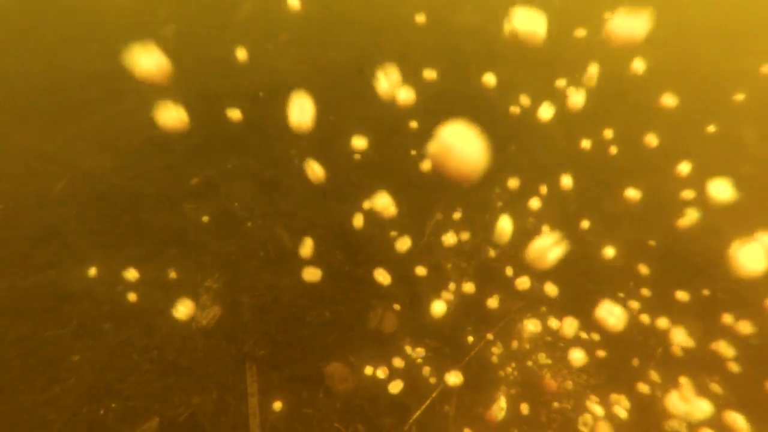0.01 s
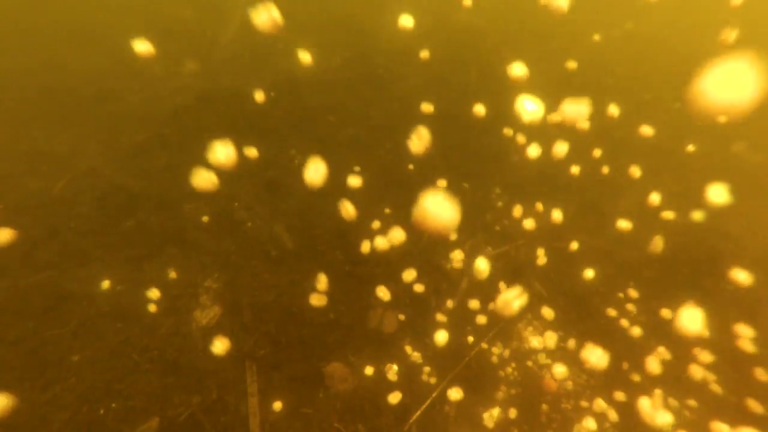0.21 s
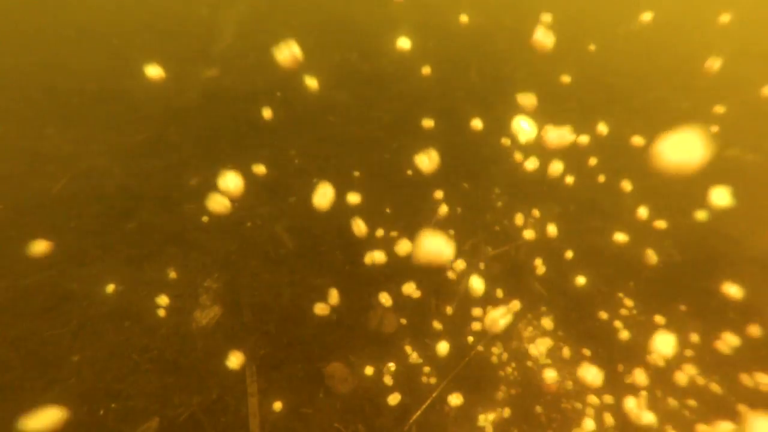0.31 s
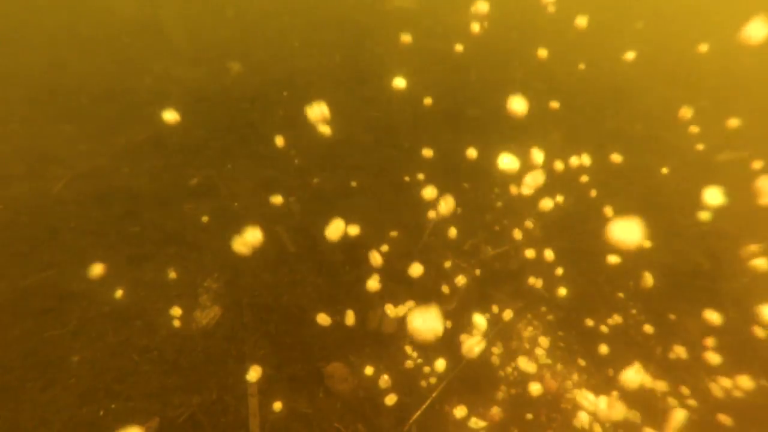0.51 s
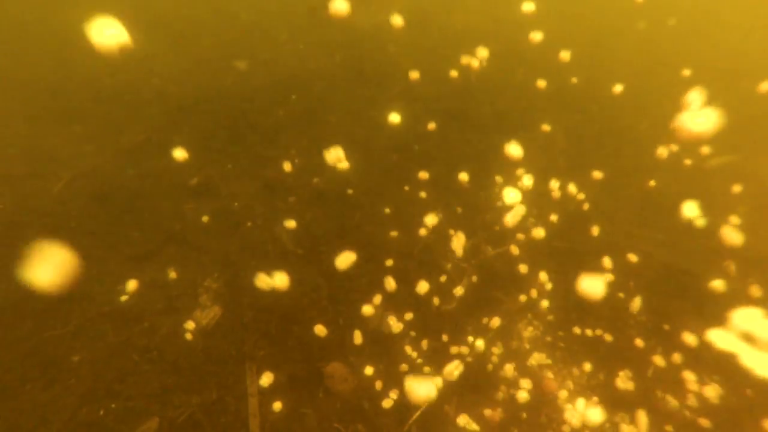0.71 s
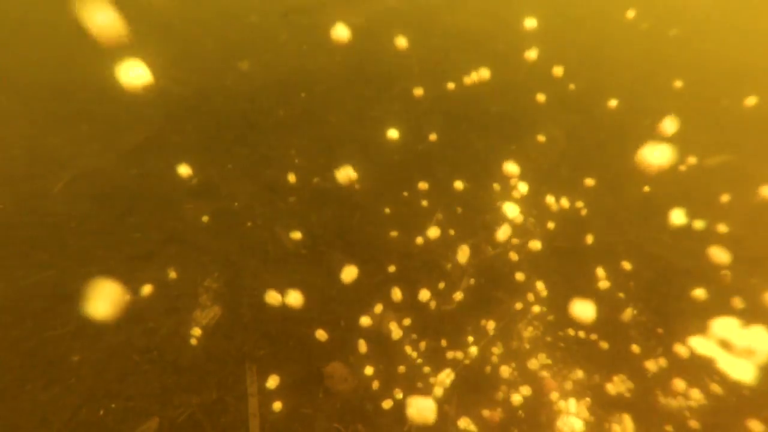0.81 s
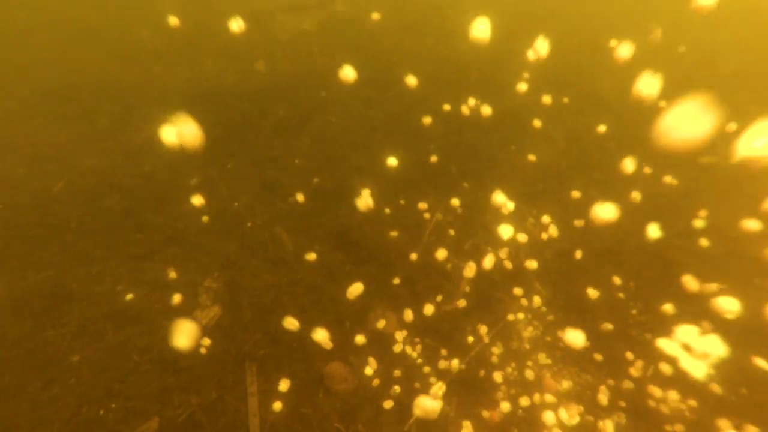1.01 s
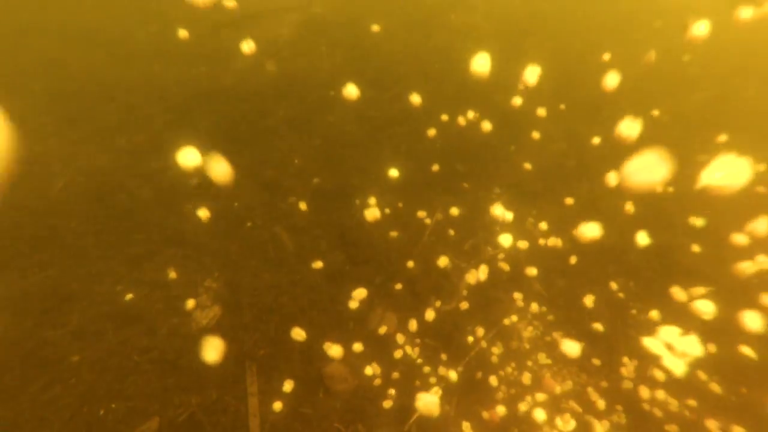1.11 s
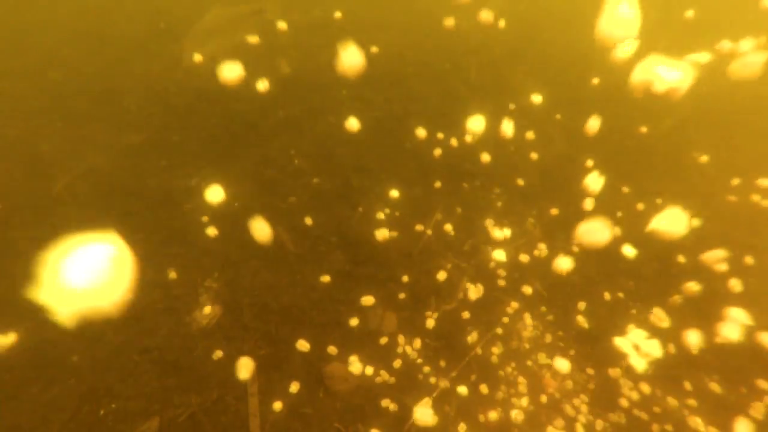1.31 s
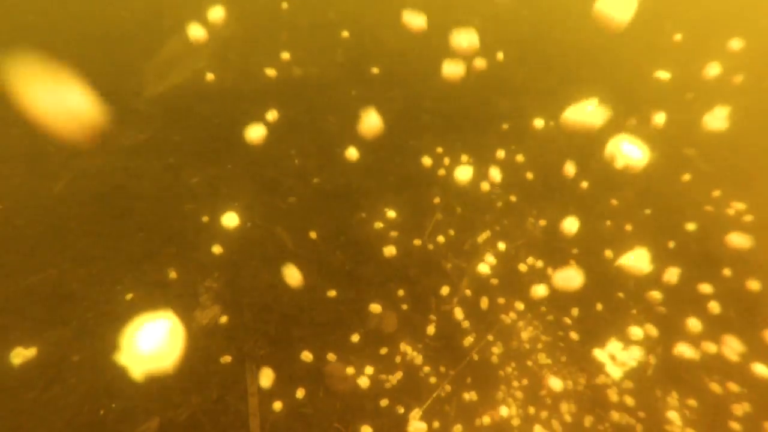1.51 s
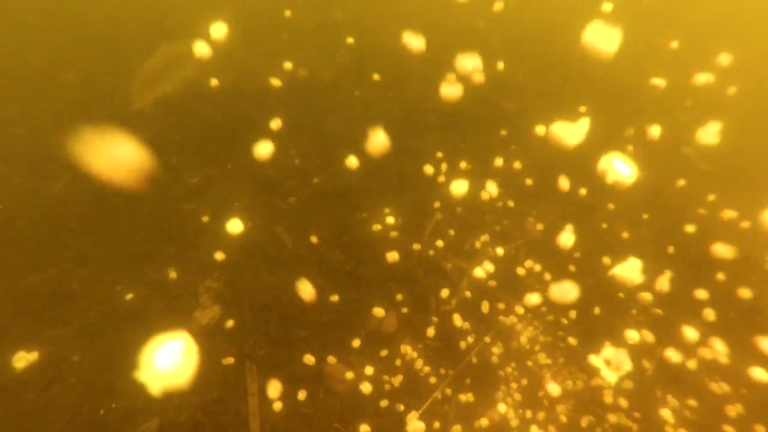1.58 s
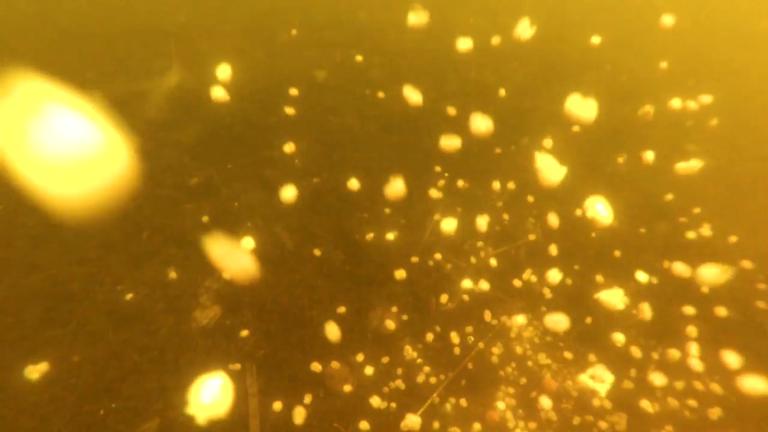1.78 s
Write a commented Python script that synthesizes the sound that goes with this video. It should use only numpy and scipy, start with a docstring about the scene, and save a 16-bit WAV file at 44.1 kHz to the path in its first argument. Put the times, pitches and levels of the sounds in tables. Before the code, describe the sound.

Short dry knocks of sinking grains on a thin shell in a murky lake, the loudest early with a low thump, others much softer; tiny bubble blips and a sudden watery swell end it, heard from inside the housing.

```python
"""Murky lake water and steady recorder hiss, then sinking grains knock on a camera's sealed housing.
Water, hiss: shaped noise. Knocks: damped modes tick in the shell, thud, ring the mount, sway the pole.
Short wave packets and noise clicks sharpen single knocks; bubbles are gliding tones.
At the end a splash swells: random drops through resonances. One microphone, nearly mono."""
import sys
import numpy as np
from scipy import signal
from scipy.fft import rfft, irfft
from scipy.io import wavfile
from scipy.ndimage import uniform_filter1d

SR = 44100
rng = np.random.default_rng(int(sys.argv[2]) if len(sys.argv) > 2 else 0)


def wav_record(signal):
    """Record a signal, one row per channel, as 16-bit PCM in the file named by sys.argv[1]."""
    frames = np.transpose(np.atleast_2d(signal))
    bounded = np.clip(frames, -1, 1)
    # unit amplitude maps onto the largest positive 16-bit level
    quanta = np.round(bounded * 32767).astype(np.int16)
    wavfile.write(sys.argv[1], SR, quanta)


def rack_gain(trim_db):
    """Turn a fader trim in dB into the linear factor to multiply a signal by."""
    fader = np.asarray(trim_db, float)
    return 10 ** (fader / 20)


N = 79380


def colour(table, rms_db):
    """Noise whose spectrum follows the table, interpolated over log frequency."""
    hz, gain_db = np.array(table, float).T
    bin_hz = np.fft.rfftfreq(N, 1 / SR) + 1  # +1 avoids log(0)
    gain = rack_gain(np.interp(np.log(bin_hz), np.log(hz), gain_db))
    noise = irfft(rfft(rng.standard_normal(N)) * gain, N)
    return noise * rack_gain(rms_db) / noise.std()


def ring(modes, rise_s, extra_db=0., length_s=0.63):
    """Damped sines that swell in over rise_s; neighbours start in opposite sense."""
    hz, level_db, t60_s = np.array(modes, float).T[:, :, None]
    t = np.arange(int(length_s * SR)) / SR
    sign = (-1.) ** np.arange(len(modes))[:, None]
    decay = np.exp(-np.log(1000) * t / t60_s)
    waves = sign * rack_gain(level_db + extra_db) * np.sin(2 * np.pi * hz * t) * decay
    return waves.sum(axis=0) * (1 - np.exp(-t / rise_s)) ** 2


def add(out, start_s, wave, peak_db):
    """Place a sound in out, scaled to a peak level."""
    i = int(start_s * SR)
    n = min(len(wave), N - i)
    out[i:i + n] += wave[:n] * rack_gain(peak_db) / np.abs(wave).max()


def band(x, hz, width_hz):
    """Two-pole resonance, gain 1 at the centre."""
    return signal.lfilter(*signal.iirpeak(hz, hz / width_hz, fs=SR), x)


def drops(per_s, spread_db):
    """Random impulses of either sign: exponential spread in dB above 1, few large and many small."""
    chance, size, side = rng.random((3, N))
    return (chance < per_s / SR) * rack_gain(-spread_db * np.log(size + 1e-9)) * np.sign(side - .5)


# water spectrum: freq_hz, density_db (per Hz)
WATER_SPECTRUM = [(12, -30), (20, -3), (54, -10.5), (112, -14), (217, -20.5), (320, -21.5), (480, -23.5),
                  (1600, -31), (5000, -36.5), (15100, -41.5)]


def murk():
    """Shaped water noise whose level flickers on smoothed random steps."""
    flicker_db, steps_per_s = 0.5, 15  # flicker: rms of the steps before smoothing
    k = SR // steps_per_s
    steps = np.repeat(rng.standard_normal(N // k + 1), k)[:N]
    return colour(WATER_SPECTRUM, -61.5) * rack_gain(flicker_db * uniform_filter1d(steps, k))


# difference-channel hiss spectrum: freq_hz, density_db (per Hz)
HISS_SPECTRUM = [(12, -72), (20, -38), (178, -12), (328, -8.5), (525, -10), (620, -9), (10200, -8),
                 (15000, -16.5)]


def hiss():
    """Recorder hiss: shaped noise in opposite sense left and right."""
    return colour(HISS_SPECTRUM, -77) * np.array([[1], [-1]])


# pole modes: pitch_hz, level_db, t60_s
POLE_MODES = [(31.9, -0.5, 0.35), (103, -19.5, 0.78)]
POLE_RISE_S = 0.0041


def pole_stir():
    """The current stirs the pole: noise drives its damped modes."""
    stir = signal.fftconvolve(rng.standard_normal(N), ring(POLE_MODES, POLE_RISE_S))[:N]
    return stir / stir.std() * rack_gain(-72)


# thin shell modes: pitch_hz, level_db, t60_s
SHELL_MODES = [(620, 0.5, 0.021), (759, -2, 0.027), (1030, -1.5, 0.02), (1250, -9.5, 0.018),
               (1341.5, -4.5, 0.019), (1700, -3.5, 0.011), (2149, -4.5, 0.014), (2520, -9, 0.018),
               (2925, -6.5, 0.0085), (3350, -1.5, 0.0093), (4250, -12, .012)]
# thud modes: pitch_hz, level_db, t60_s
THUD_MODES = [(130, -8, 0.044), (242.2, 2.5, 0.037), (357, 2, .035), (490, -4.5, 0.023)]
# mount's low ring, a beating pair and a weak mode: pitch_hz, level_db, t60_s
LOW_RING_MODES = [(330.8, 6, 0.15), (288.8, 0.5, 0.17), (395, -23, 0.068)]
# mount's high ring: pitch_hz, level_db, t60_s
HIGH_RING_MODES = [(582, 10, 0.074), (600, -29, 0.11), (750, -20, 0.1)]
SHELL_RISE_S = 0.00044


def far_ticks():
    """Far grains: random impulses strike shell and mount modes, fading steadily."""
    per_s, spread_db, start_db, fade_db_per_s = 40, 3, -70.5, 4  # start_db: smallest tick's peak at 0 s
    modes = THUD_MODES + SHELL_MODES[:5] + LOW_RING_MODES + HIGH_RING_MODES
    body = ring(modes, SHELL_RISE_S, length_s=.2)
    far = signal.fftconvolve(drops(per_s, spread_db), body / np.abs(body).max())[:N]
    return far * rack_gain(start_db - fade_db_per_s * np.arange(N) / SR)


# knocks that sway the pole: start_s, peak_db
POLE_SWAYS = [(.0803, -62), (.1358, -65), (0.248, -38), (.4357, -69.5), (0.5074, -50), (0.626, -69),
              (0.9251, -53.5), (1.235, -62), (1.573, -68)]


def sways():
    """Stronger pushes set the pole's damped modes swinging."""
    out = np.zeros(N)
    for start_s, peak_db in POLE_SWAYS:
        add(out, start_s, -ring(POLE_MODES, POLE_RISE_S), peak_db)
    return out


# grain knocks: start_s, tick_peak_db, tick_centre_hz, tick_spread_octaves,
# thud_peak_db, low_ring_peak_db, high_ring_peak_db
GRAIN_KNOCKS = [(0.0804, -49.5, 1610, 0.49, -46, -45, -45.5),
                (0.1356, -58.5, 1230, 0.88, -44.5, -43.5, -33),
                (0.2315, -54.5, 1180, 0.49, -65.5, -57, -52), (0.2473, -10.5, 1250, 0.81, -30.5, -37, -28),
                (0.3044, -36.5, 1206, 0.74, -40.5, -46.5, -50), (.387, -60, 1300, .5, -63, -66, -59),
                (.401, -56, 900, .6, -60, -66, -66.5), (0.4349, -41.5, 926, 1, -43.5, -48.5, -55.5),
                (0.5064, -43.5, 970, 1, -45.5, -53, -52.5), (0.5454, -43.5, 1110, 0.88, -54, -61, -60),
                (0.5988, -21, 1700, 0.64, -39.5, -48, -42), (0.6257, -46, 2000, 0.87, -39, -48.5, -51.5),
                (0.7401, -41, 980, 0.77, -51.5, -66.5, -51.5), (0.927, -48, 1224, 0.31, -41, -40, -39.5),
                (1.235, -49.5, 1140, .5, -65.5, -66.5, -67), (1.2495, -34, 798, 0.54, -44.5, -58, -65),
                (1.2635, -41, 1051, 0.54, -43.5, -80, -71), (1.462, -54, 705, 0.5, -60, -83.5, -71.5),
                (1.572, -36, 1300, 0.61, -50.5, -48, -62.5)]


def knocks():
    """Each grain wakes the shell modes near its tick centre, thuds and rings the mount."""
    thud_rise_s, ring_rise_s, scatter_db = 0.001, 0.00073, 2.5
    out, shell_hz = np.zeros(N), np.array(SHELL_MODES)[:, :1]
    thud = ring(THUD_MODES, thud_rise_s)
    low, high = ring(LOW_RING_MODES, ring_rise_s), ring(HIGH_RING_MODES, ring_rise_s)
    for start_s, tick_db, centre_hz, octaves, thud_db, low_db, high_db in GRAIN_KNOCKS:
        reach_db = -6 * (np.log2(shell_hz / centre_hz) / octaves) ** 2
        reach_db = reach_db + scatter_db * rng.standard_normal((len(SHELL_MODES), 1))
        add(out, start_s, -ring(SHELL_MODES, SHELL_RISE_S, reach_db, length_s=.08), tick_db)
        add(out, start_s, thud, thud_db)
        add(out, start_s, low, low_db)
        add(out, start_s, high, high_db)
    return out


# notes in single knocks, by where the grain lands: envelope_peak_s, pitch_hz, length_cycles, peak_db
KNOCK_NOTES = [(0.0807, 1380, 2.5, -49), (0.2489, 1193, 4.15, -11), (0.2493, 1030, 5.8, -17),
               (.25, 626, 3.7, -20.5), (0.2489, 3350, 9.6, -29.5), (.3075, 2000, 3.8, -59),
               (.4372, 665, 4.9, -43), (0.4364, 1390, 3, -51), (0.5073, 1150, 1.8, -46.5),
               (0.5467, 1840, 3.3, -57), (0.6001, 1636, 3.5, -14), (.5998, 2200, 5.1, -20.5),
               (0.5997, 3120, 2.26, -33.5), (.6015, 690, 3.64, -29.5), (.628, 1650, 3.8, -38.5),
               (.629, 650, 2.3, -34.5), (.7416, 620, 2.5, -48.5), (.928, 1465, 4.8, -45.5),
               (.9285, 2200, 8.7, -53), (.93, 744, 6, -48), (1.2507, 520, 1.03, -29.5),
               (1.2654, 564, 1.2, -34), (1.575, 375, 2.6, -36), (1.5769, 1058, 7.4, -37.5)]


def notes():
    """Wave packets of a few cycles, each with a chance phase; the rise is shorter than the fall."""
    rise_share = 0.66
    out, t = np.zeros(N), np.arange(-SR // 100, SR // 100) / SR
    side = np.where(t < 0, rise_share, 1)
    for peak_s, hz, cycles, peak_db in KNOCK_NOTES:
        envelope = np.exp(-(2 * t * hz / cycles / side) ** 2)
        wave = np.cos(2 * np.pi * (hz * t + rng.random()))
        add(out, peak_s + t[0], wave * envelope, peak_db)
    return out


# treble clicks of hard grains: start_s, peak_db, centre_hz, width_hz (each of two passes)
HARD_CLICKS = [(0.248, -47, 5300, 2020), (.3065, -56.5, 6700, 1990), (.5995, -41, 11030, 3500),
               (0.5999, -41.5, 4200, 1956), (0.6277, -62, 9100, 3000), (0.6289, -60, 3300, 1500),
               (0.9276, -59.5, 2950, 400), (0.9265, -57, 3600, 400), (1.2498, -52, 7140, 2000),
               (1.25, -62, 3420, 600), (1.2502, -52, 2500, 900), (1.573, -53, 2870, 1170)]


def clicks():
    """Very short decaying noise bursts, resonated twice around a centre."""
    t60_s = 0.0041
    out, t = np.zeros(N), np.arange(SR // 50) / SR
    for start_s, peak_db, hz, width_hz in HARD_CLICKS:
        burst = rng.standard_normal(len(t)) * np.exp(-np.log(1000) * t / t60_s)
        add(out, start_s, band(band(burst, hz, width_hz), hz, width_hz), peak_db)
    return out


# bubbles: start_s, pitch_hz, peak_db, length_s (to 1/e)
BUBBLE_TONES = [(0.691, 328, -57.5, 0.023), (1.598, 312.5, -50.5, 0.019), (1.624, 763, -57, 0.02),
                (1.785, 870, -32, 0.0049)]


def bubbles():
    """Soft tones that hold, rise a little in pitch and fade."""
    glide = 0.022  # share of pitch gained by length_s
    out = np.zeros(N)
    for start_s, hz, peak_db, length_s in BUBBLE_TONES:
        t = np.arange(int(2 * length_s * SR)) / SR
        shape = (1 - np.exp(-t * hz / .7)) * np.exp(-(t / length_s) ** 3)
        cycles = hz * t * (1 + glide * t / length_s / 2)
        add(out, start_s, shape * np.sin(2 * np.pi * cycles), peak_db)
    return out


# splash level curve: time_s, gurgle_db, body_db, fizz_db
SPLASH_LEVELS = [(1.735, -83, -76.5, -84), (1.751, -63, -70, -72), (1.76, -61, -82, -69),
                 (1.768, -60.5, -66, -69), (1.778, -58, -62, -47.5), (1.786, -44.5, -45, -51),
                 (1.8, -42, -45.5, -64)]
# low resonances: centre_hz, width_hz, level_db
GURGLE_BANDS = [(680, 120, 2.5), (900, 200, -4)]
# middle resonances: centre_hz, width_hz, level_db
BODY_BANDS = [(1650, 200, -0.5), (1800, 200, -1), (2200, 250, -6.5)]
# high resonances: centre_hz, width_hz, level_db
FIZZ_BANDS = [(2630, 277, 2.5), (3040, 330, 1), (3506, 311, -0.5), (4352, 330, -16)]


def splash():
    """A swelling shower at the surface: dense drops excite low, middle and high resonances."""
    drops_per_s, spread_db = 4000, 3.5
    t, (time_s, *levels) = np.arange(N) / SR, np.array(SPLASH_LEVELS, float).T
    out = np.zeros(N)
    for bands, curve_db in zip((GURGLE_BANDS, BODY_BANDS, FIZZ_BANDS), levels):
        shower = drops(drops_per_s, spread_db)
        x = np.zeros(N)
        for hz, width_hz, level_db in bands:
            resonance = band(band(shower, hz, width_hz), hz, width_hz)
            x += rack_gain(level_db) * resonance / np.sqrt(width_hz)
        out += x / x.std() * rack_gain(np.interp(t, time_s, curve_db, left=-120))
    return out


def scene():
    """One microphone; only a little hiss differs between the channels."""
    water = murk() + pole_stir() + far_ticks()
    grains = sways() + knocks() + notes() + clicks()
    mid = water + grains + bubbles() + splash()
    return mid + hiss()


def roll_off(x):
    """The treble ends steeply here."""
    return signal.sosfilt(signal.butter(12, 15240, fs=SR, output="sos"), x)


def record(dry):
    """A steep elliptic low-pass cuts the top above 15150 Hz."""
    low_pass = signal.ellip(10, .2, 60, 15150, fs=SR, output="sos")
    mix = signal.sosfilt(low_pass, dry)
    return roll_off(mix)


dry = scene()
out = record(dry)
wav_record(out)
```